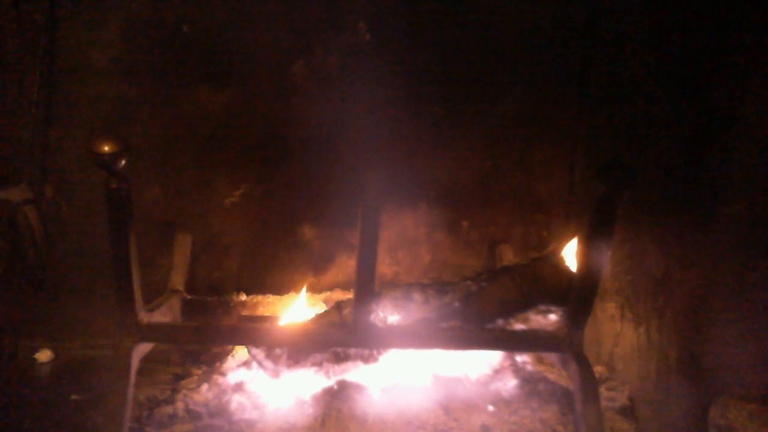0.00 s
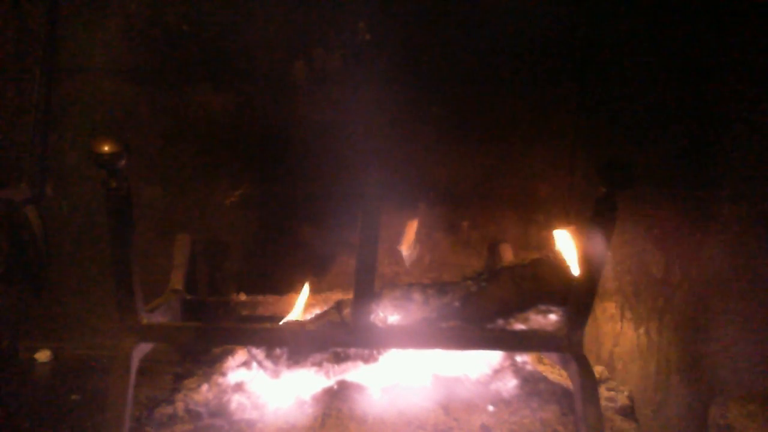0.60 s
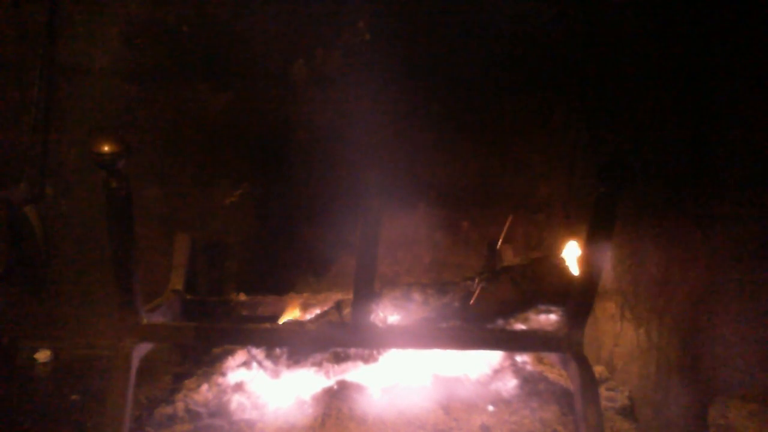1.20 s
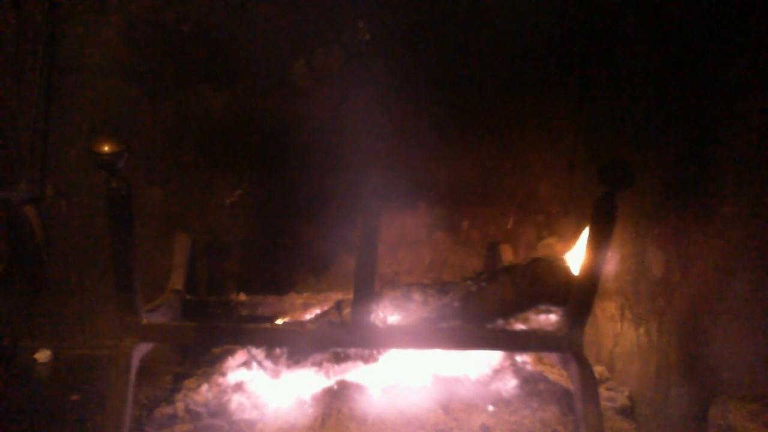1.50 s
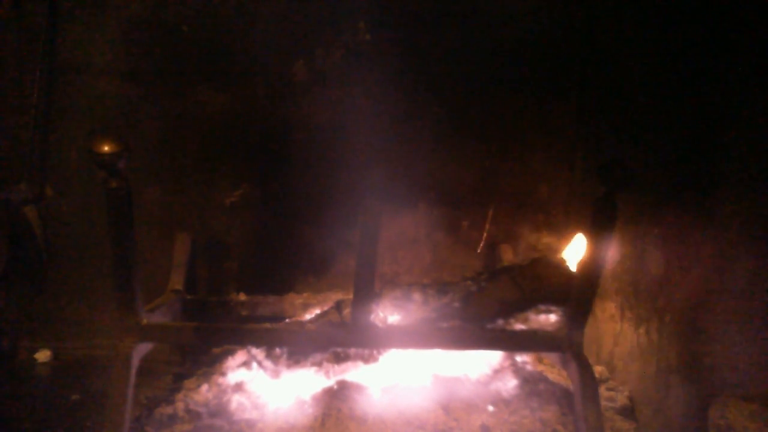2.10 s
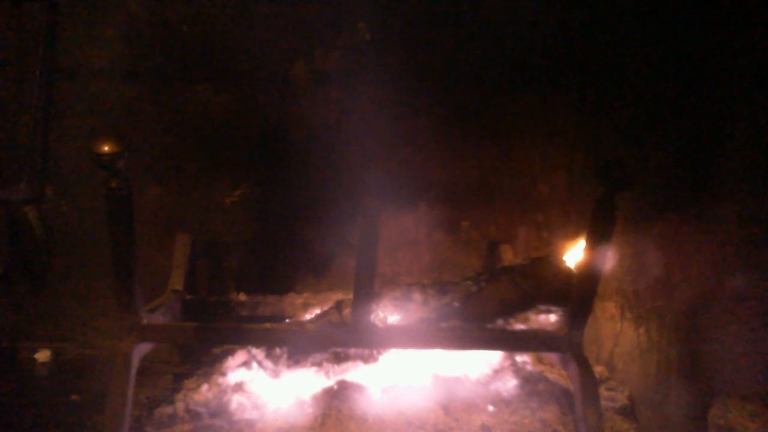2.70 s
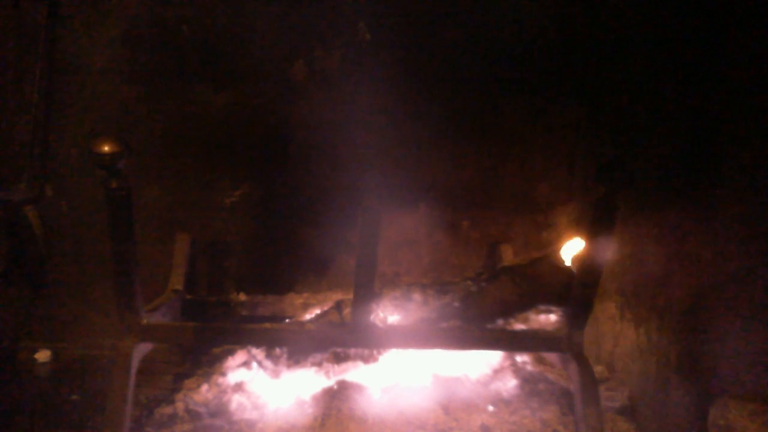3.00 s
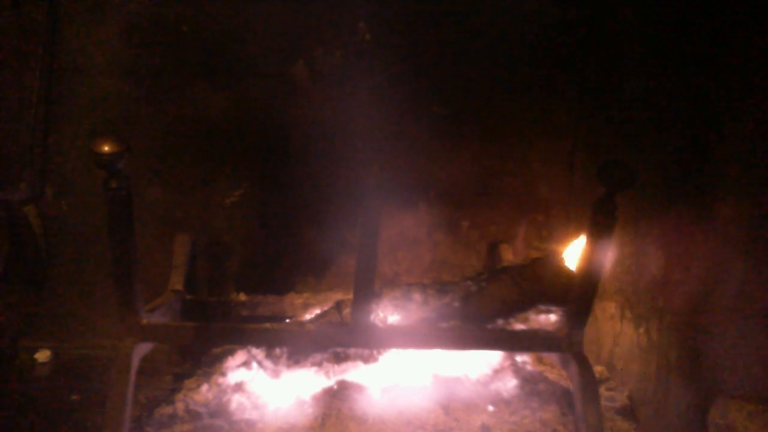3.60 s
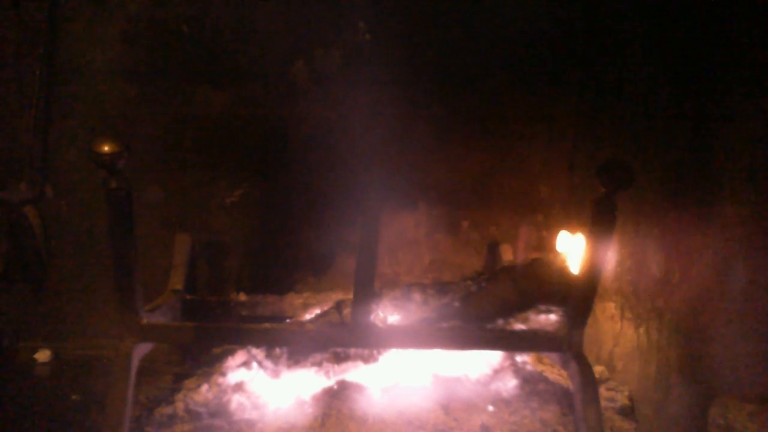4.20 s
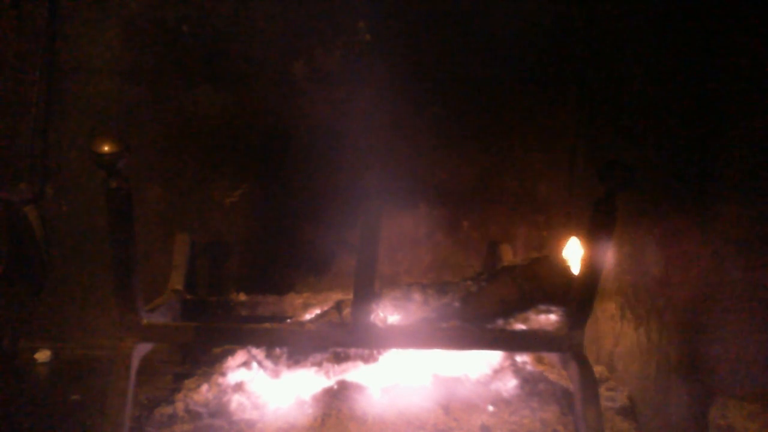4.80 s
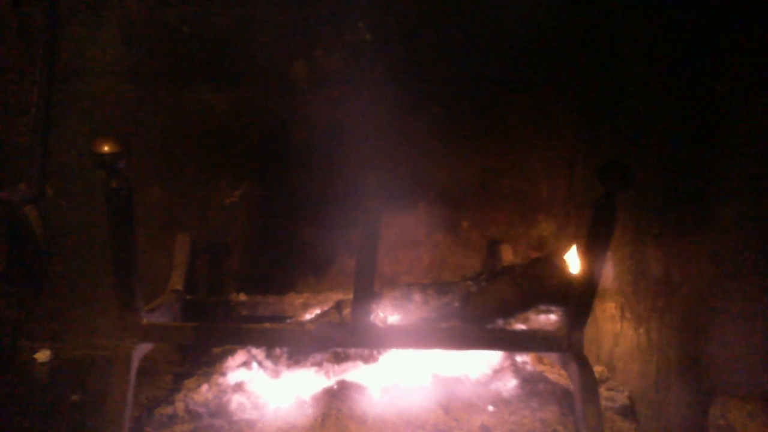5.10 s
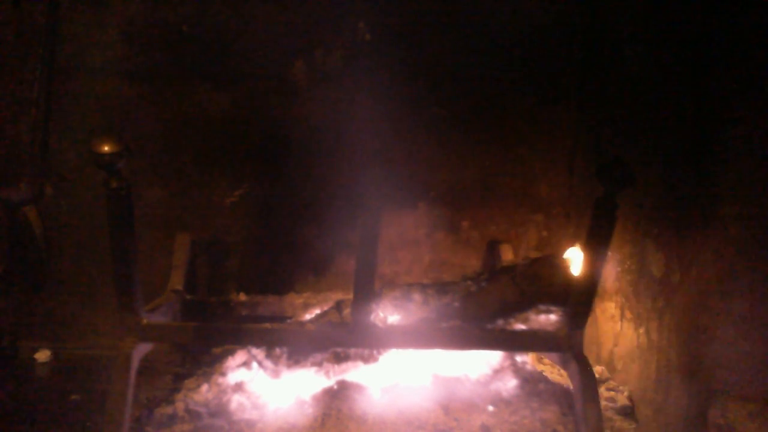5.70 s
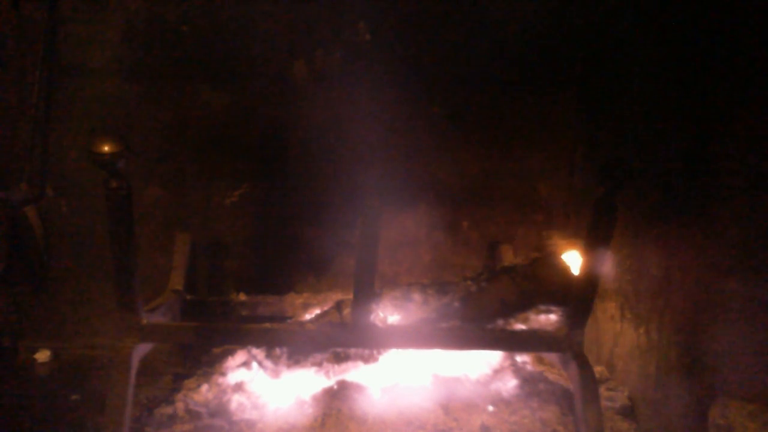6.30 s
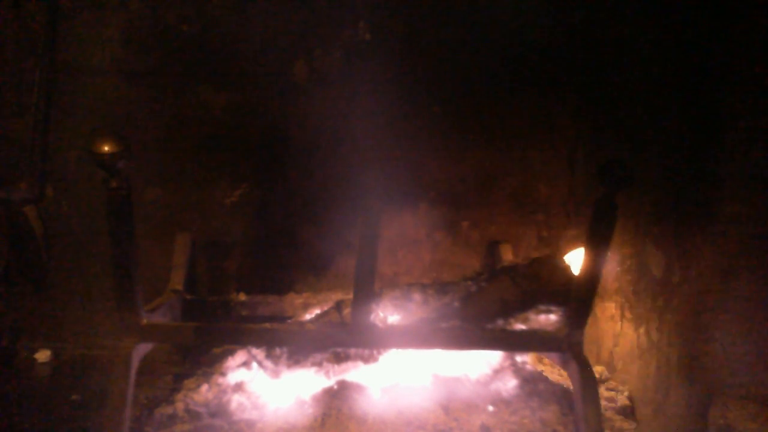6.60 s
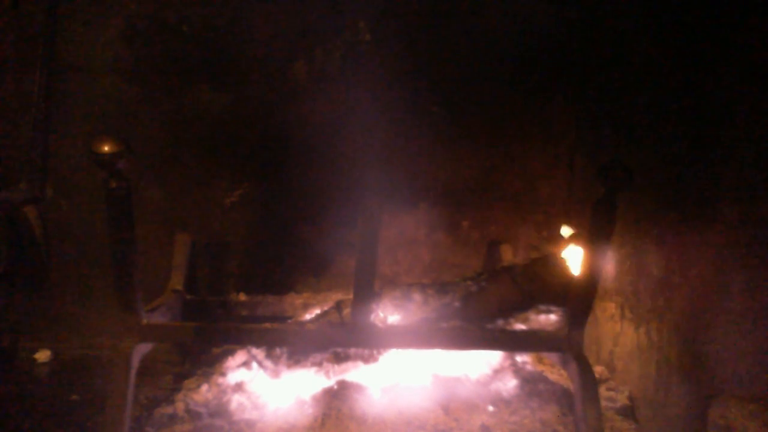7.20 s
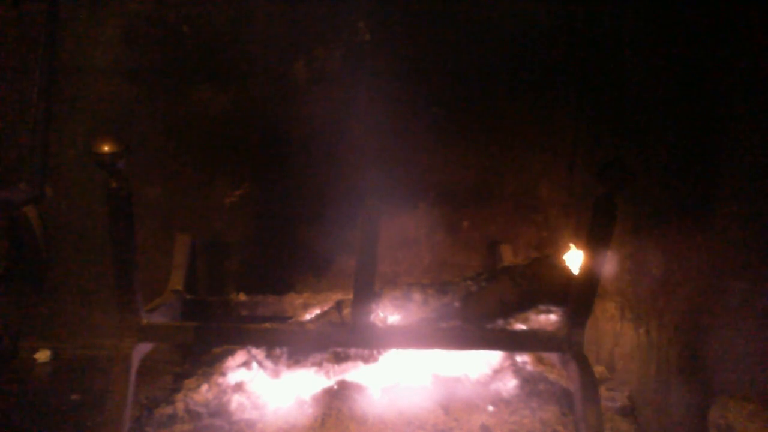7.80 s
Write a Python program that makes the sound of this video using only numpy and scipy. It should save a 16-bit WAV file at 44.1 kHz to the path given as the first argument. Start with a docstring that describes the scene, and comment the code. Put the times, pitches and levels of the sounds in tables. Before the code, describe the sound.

A low wood fire burns in an indoor brick fireplace. A soft rumble of air in the flue runs throughout, strongest at the very start, with a faint wavering hum and steady microphone hiss. Across the room a clock ticks faintly once a second from about 0.6 seconds. At 0.8 seconds comes the loudest event, a sharp crack with a hollow pop and a brief echo off the bricks. Smaller, thin snaps follow near 1.2, 2.2 and 3 seconds, and the coals give tiny scattered ticks. The fire is quieter from 3 to 5.5 seconds, with two very soft, low flutters of flame around 4.4 and 4.8 seconds. Light crackling builds to a bright, strong snap at 6 seconds. Three quick, high snaps follow around 6.5 seconds, and a few more between 7.6 and 7.9 seconds.

```python
"""First comes a low rumble: air drawn up the flue of a brick fireplace, over a faint hum.
A low wood fire burns there. Charred fibres snap now and then, ring briefly and echo off the bricks;
gas pockets knock, coals tick and the flame flutters softly. Across the room a clock ticks once a second.
The small camera adds its own hiss and a thin whine."""
import sys
import numpy as np
from scipy import signal
from scipy.fft import rfft, irfft, next_fast_len
from scipy.io import wavfile
from scipy.ndimage import map_coordinates

SR = 44100
rng = np.random.default_rng(int(sys.argv[2]) if len(sys.argv) > 2 else 0)


def int16_out(signal):
    """Quantize to a 16-bit WAV file."""
    q = np.round(np.clip(np.atleast_2d(signal).T, -1, 1) * 32767)
    wavfile.write(sys.argv[1], SR, q.astype(np.int16))


N = 347949
TIME = np.arange(N) / SR
CLICK_HZ = np.fft.rfftfreq(1024, 1 / SR)  # the frequencies on which clicks are shaped


def amp(db):
    """Turn decibels into a number to multiply by."""
    return 10 ** (np.asarray(db) / 20)


def unit(x):
    """Scale a sound to an average strength (rms) of 1."""
    return x / np.sqrt(np.mean(x ** 2) + 1e-30)


def filtered(x, response):
    """Turn each frequency f in a sound up or down by response(f)."""
    size = next_fast_len(len(x) + 8192)
    return irfft(rfft(x, size) * response(np.fft.rfftfreq(size, 1 / SR)), size)[:len(x)]


def noise(points):
    """Noise of strength 1, its tone shaped by rows of f/Hz, relative level/dB."""
    hz, db = np.transpose(points)
    white = rng.standard_normal(N)
    return unit(filtered(white, lambda f: amp(np.interp(np.log(f + 1), np.log(hz), db))))


def wobble(rate):
    """A smooth curve through `rate` random values a second."""
    return map_coordinates(rng.standard_normal(int(N * rate / SR) + 4), [TIME * rate])


def wavering(tones):
    """Tones that drift at random; the wider a tone, the faster it wavers."""
    track = np.zeros(N)
    for hz, db, width in tones:
        phase = 2 * np.pi * hz * TIME
        track += amp(db) * unit(wobble(width) * np.cos(phase) + wobble(width) * np.sin(phase))
    return track


def impulse(gain):
    """A click of energy 1 whose frequencies have the strengths in `gain`."""
    cepstrum = irfft(np.log(gain / gain.max() + 1e-4))
    half = len(cepstrum) // 2
    folded = np.r_[cepstrum[0], 2 * cepstrum[1:half]]  # packs the energy at the start of the click
    click = irfft(np.exp(rfft(folded, 2 * half)))
    return click / np.linalg.norm(click)


def resonance(hz, width_hz):
    """A steep peak of energy 1 around the pitch at which something rings."""
    gain = 1 / (1 + (2 * (CLICK_HZ - hz) / width_hz) ** 2)
    return gain / np.linalg.norm(gain)


def add(track, start_s, sound):
    """Mix a sound into the track at the given time."""
    part = track[max(round(start_s * SR), 0):][:len(sound)]
    part += sound[:len(part)]


# The tones in the hum: f/Hz, level/dB, width/Hz
HUM_TONES = [(523.6, -70, 14), (544.6, -68, 11), (571, -69.5, 26), (634, -73.5, 20), (821, -73, 28)]
# How far the hum is turned up or down: t/s, level/dB
HUM_CHANGES = [(0, 1), (2.7, 1.5), (3.2, -0.5), (4.6, -0.5), (5.2, -4), (6.2, -1.5), (6.7, 2), (7.2, -2),
               (7.89, -1.5)]

def hum():
    """A faint wavering hum that sinks after the first seconds and briefly swells again."""
    change_db = np.interp(TIME, *np.transpose(HUM_CHANGES))
    return amp(change_db) * wavering(HUM_TONES)


# How hard the flue pulls air: t/s, relative level/dB
FLUE_PULL = [(0.0, -25), (0.11, -48.5), (0.7, -34), (1.16, -51.5), (1.34, -40.5), (2.4, -48.5), (3.01, -37),
             (3.07, -43.5), (5.47, -49.5), (5.91, -40), (7.47, -47.5), (7.89, -38.5)]
# The tone of the flue's rumble: f/Hz, relative level/dB
FLUE_RUMBLE = [(15, -24), (24, -18.5), (30, 4.5), (37, -1), (46, -20), (58, -11), (70, -12.5), (80, -16),
               (110, -28), (200, -37.5), (600, -106)]
# Low notes of flue and room, stirred by the draught: f/Hz, level/dB, width/Hz
BOOM_TONES = [(58.2, -51.5, 4), (84.15, -57, 8), (134, -60.5, 14), (157.4, -60, 5), (216, -67, 14),
              (266.7, -67.5, 7), (315, -71, 8), (396, -71, 7)]
# The steady murmur of the room: f/Hz, relative level/dB
ROOM_MURMUR = [(50, -10.5), (100, 0), (140, -2.5), (200, -5.5), (400, -12), (700, -17), (1100, -19),
               (1900, -30.5), (4000, -47)]

def draught(level_db=-42.5, follow=0.53, murmur_db=-53):
    """Air drawn up the flue rumbles in slow surges over the room's murmur."""
    pull_db = np.interp(TIME, *np.transpose(FLUE_PULL))
    surge_db = follow * (pull_db - pull_db.mean())  # the rumble swings about half as far as the pull
    rumble = amp(level_db + surge_db) * noise(FLUE_RUMBLE)
    return rumble + wavering(BOOM_TONES) + amp(murmur_db) * noise(ROOM_MURMUR)


# The notes at which the clock's case rings: f/Hz, width/Hz, relative level/dB
CASE_NOTES = [(604, 130, -0.5), (830, 210, 1), (1206, 135, 3.5), (1454, 160, 0.5), (2230, 1200, -12),
              (3050, 370, -12), (3950, 370, -17.5), (4570, 370, -13.5)]

def clock(first_s=0.641, tick_db=-55.0, tock_db=-59.5, rise_s=0.03, fade_s=0.35):
    """Tock and tick take turns, one a second, ringing in the case and blurred by the room."""
    def case(f):
        peaks = (amp(db) / (1 + 2 * ((f - hz) / width) ** 2) for hz, width, db in CASE_NOTES)
        return np.sqrt(sum(peak ** 2 for peak in peaks))

    loudness = np.zeros(N)
    for beat in range(N // SR + 1):
        age = TIME - first_s - beat
        rise = np.exp(-(np.minimum(age, 0) / rise_s) ** 2)
        fade = amp(-60 * np.maximum(age, 0) / fade_s)  # a fade time is the time to drop by 60 dB
        loudness += amp(tick_db if beat % 2 else tock_db) * rise * fade
    return loudness * unit(filtered(rng.standard_normal(N), case))


# Soft flares of the flame: t/s, level/dB
FLAME_FLARES = [(0.15, -54), (4.37, -54), (4.84, -55.5)]
# The tone of a flare: f/Hz, relative level/dB
FLAME_FLUTTER = [(60, -10), (130, 3.5), (250, -2), (450, -5), (800, -9.5), (1300, -21), (2500, -45)]

def flame(swell_s=0.053):
    """The flame flares now and then with a soft, low flutter."""
    loudness = sum(amp(db) * np.exp(-((TIME - s) / swell_s) ** 2) for s, db in FLAME_FLARES)
    return loudness * noise(FLAME_FLUTTER)


def firebox(click, tear_fade_s, break_db=-6, walls_db=1.0, room_db=-7.5):
    """A sharp break and a brief tearing burst, then quick echoes off the bricks and the room's tail."""
    walls_fade_s, room_fade_s, room_rise_s = .044, .3, .012
    t = np.arange(SR // 3) / SR
    tear, walls, room = rng.standard_normal((3, len(t)))
    tear = tear * amp(-60 * t / tear_fade_s)
    walls = walls * np.abs(walls)  # a few strong echoes stand out
    walls = walls * amp(-60 * t / walls_fade_s) * (t > .001)
    room = room * amp(-60 * t / room_fade_s) * (1 - np.exp(-t / room_rise_s))
    paths = (1. * (t == 0), tear, walls, room)
    direct, torn, echoes, tail = (unit(signal.fftconvolve(click, path)) for path in paths)
    sound = amp(break_db) * direct + torn + amp(walls_db) * echoes + amp(room_db) * tail
    return sound / np.linalg.norm(sound)


def crack(hz, sharpness, second_hz, second_db, snap_db, tear_fade_s, thin_hz=3300, dull_hz=10200):
    """One fibre breaks: a bright snap and two ringing notes; the splinter is too small to give off bass. In the
    heavy cracks the second note, near 4 kHz, is the log's body ringing."""
    snap = 1 / np.sqrt(1 + (CLICK_HZ / dull_hz) ** 6)
    bass_cut = 1 / np.sqrt(1 + (thin_hz / (CLICK_HZ + 1)) ** 12)
    snap = amp(snap_db) * snap / np.linalg.norm(bass_cut * snap)
    main_note = resonance(hz, hz / sharpness)
    second_note = amp(second_db) * resonance(second_hz, second_hz / sharpness)
    ring = np.hypot(main_note, second_note)
    gain = bass_cut * np.hypot(ring, snap)
    return np.linalg.norm(gain) * firebox(impulse(gain), tear_fade_s)


def embers(count=28, level_db=-47, spread_db=7, lowest_hz=7000, range_hz=5000):
    """Glowing coals give tiny ticks at random, most of them barely above the hiss."""
    track = np.zeros(N)
    for when, size, pitch in rng.random((count, 3)):
        hz = lowest_hz + range_hz * pitch
        tick = crack(hz, sharpness=6, second_hz=.7 * hz, second_db=-4, snap_db=-1, tear_fade_s=0.0099)
        add(track, when * N / SR, amp(level_db + spread_db * size ** 2) * tick)
    return track


# Snapping fibres, and among the faintest rows a few tiny ticks of the coals: t/s, relative level/dB, f/Hz,
# sharpness (higher rings longer), second note f/Hz, second note level/dB, snap level/dB (both compared with the
# main note), tearing fade t/s
CRACKS = [(0.5631, -68, 6100, 4, 9500, -2, 1, .006), (0.6298, -60, 5670, 5, 7900, -4, 0, .011),
          (0.7538, -57, 10100, 4, 4200, -6, -2, .02), (0.7578, -40.5, 6000, 3.8, 3930, -1.5, 3, .018),
          (0.785, -48.5, 9000, 3.5, 4300, -1.5, 4, .008), (1.0862, -67, 8640, 6, 6800, -2, 0, .008),
          (1.2354, -52.5, 8300, 2.6, 3600, -13, -10, 0.0086),
          (1.3632, -68, 8650, 4, 3000, 7, -1, .011), (1.508, -63, 9200, 4.5, 5260, -2, -1, .006),
          (1.5266, -63, 10900, 7, 8800, -4, -6, .008), (1.7309, -63, 11800, 4, 9200, -4, -3, .006),
          (2.235, -59, 8900, 4.9, 4300, -16, -8, .008), (2.363, -65.5, 11200, 9.2, 4350, -3, 0, .011),
          (2.985, -48.5, 10300, 3.6, 7700, -7, -10, 0.0087), (3.3482, -68, 8620, 4, 14500, 2, 1, .008),
          (4.342, -68, 7750, 5, 9800, -2, -2, .011), (5.465, -67, 10200, 5, 8100, 1, -3, .011),
          (5.574, -69, 5870, 8, 7300, 2, -5, .011), (5.7062, -63, 8500, 4, 4800, -2, -1, .009),
          (5.7628, -55.5, 11280, 11, 8500, -7, -4.5, 0.0074), (5.855, -64, 9400, 4, 7200, -8, 0, .009),
          (5.9658, -41.5, 10300, 1.9, 3760, -9, -11, 0.017),
          (5.9708, -43.5, 10200, 9, 4160, -10, -9, 0.008),
          (6.4085, -49.5, 11900, 6, 9700, -6, -9, 0.014),
          (6.473, -53, 11900, 6.5, 9700, -10, -8, .009),
          (6.5275, -53.5, 11900, 7, 8900, -2.5, -9, .007),
          (6.5912, -62, 11800, 4.5, 4340, -2, -1, .009), (6.783, -65, 9800, 5, 7500, -8, -4, .011),
          (7.5437, -69, 9480, 5, 7500, -2, -4, .008), (7.659, -50, 10740, 16, 9140, -8, -23, .013),
          (7.6903, -67, 11500, 5, 8700, -2, -5, .011), (7.798, -55, 8980, 16, 6160, -8, -21, .006),
          (7.849, -52.5, 11600, 7, 6800, -14, -9, .008)]
# Gas pockets that burst: t/s, relative level/dB
GAS_POPS = [(0.7574, -47.5), (.786, -68)]

def logs(crack_boost_db=28, pop_boost_db=30.0, pop_hz=1600, pop_width_hz=1650, pop_fade_s=0.013):
    """Charred fibres in the logs snap, a few coals tick, and pockets of gas burst with a hollow knock."""
    track = np.zeros(N)
    for start_s, db, *fibre in CRACKS:
        add(track, start_s, amp(crack_boost_db + db) * crack(*fibre))
    knock = impulse(resonance(pop_hz, pop_width_hz))
    for start_s, db in GAS_POPS:
        pop = firebox(knock, pop_fade_s, walls_db=-1.0, room_db=-1.5)
        add(track, start_s, amp(pop_boost_db + db) * pop)
    return track


def scene():
    """Fire, clock and room together in one channel."""
    return (logs() + embers() + flame() + clock() + draught() + hum())[None]


# The tone of the microphone's hiss: f/Hz, relative level/dB
MIC_HISS = [(200, -3.5), (2500, 2), (4000, 1.5), (7000, 1), (12000, 1.5), (15500, 2.5)]

def record(dry, hiss_db=-61.0, whine_hz=8640, whine_db=-81.5, waver=0.94, top_hz=15850, offset=-.0204):
    """The camera adds hiss and a thin whine, cuts the highest treble and shifts the wave off zero."""
    whine = unit(np.sin(2 * np.pi * whine_hz * TIME + waver * wobble(13)))
    sound = dry[0] + amp(hiss_db) * noise(MIC_HISS) + amp(whine_db) * whine
    return filtered(sound, lambda f: f < top_hz)[None] + offset


dry = scene()
out = record(dry)
int16_out(out)
```